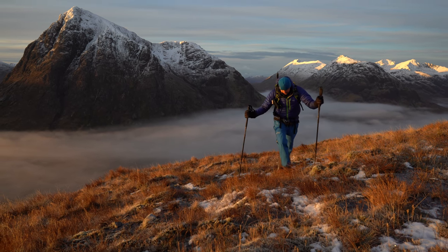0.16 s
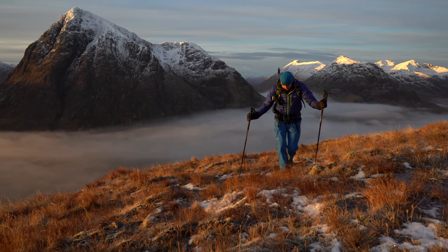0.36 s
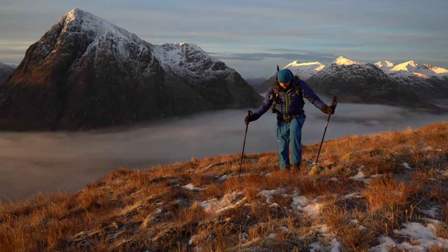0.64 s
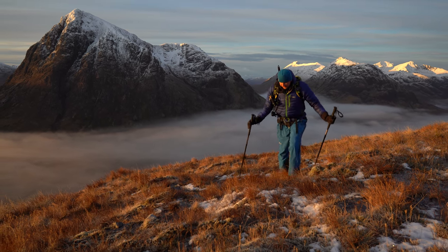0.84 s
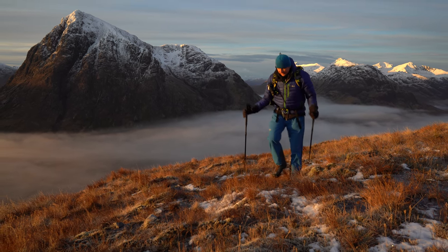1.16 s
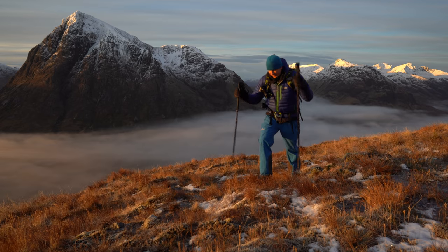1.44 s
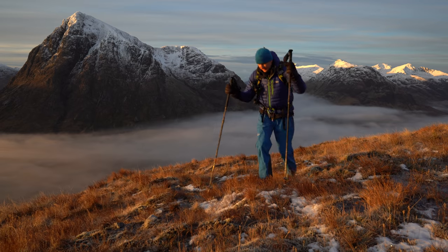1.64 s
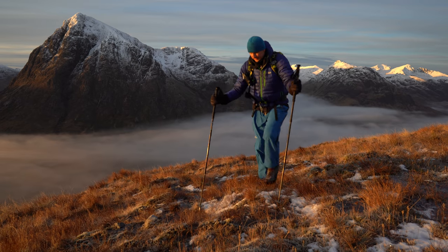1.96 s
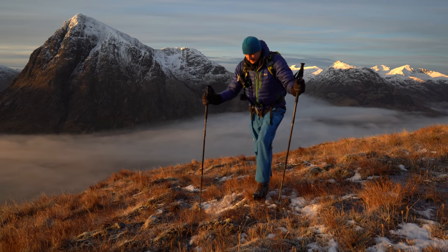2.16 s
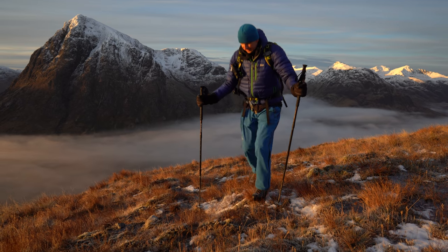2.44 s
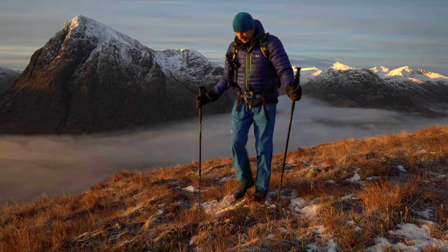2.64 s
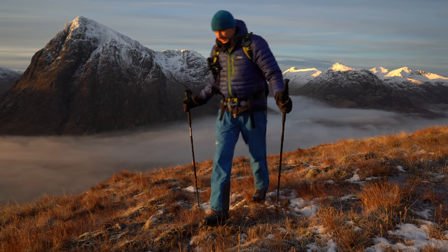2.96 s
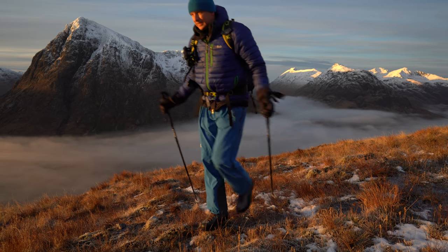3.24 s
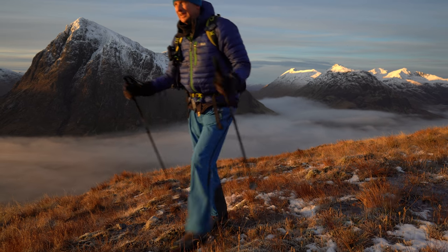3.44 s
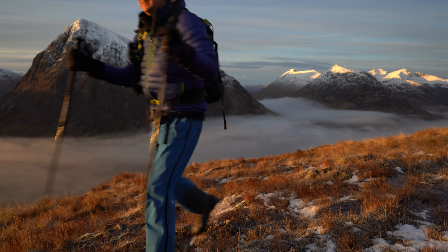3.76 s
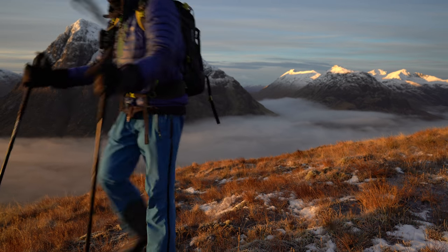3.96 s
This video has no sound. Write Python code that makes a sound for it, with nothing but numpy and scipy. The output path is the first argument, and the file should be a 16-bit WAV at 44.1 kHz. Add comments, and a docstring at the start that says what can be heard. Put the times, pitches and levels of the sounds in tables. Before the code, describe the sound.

Footsteps approach a stationary microphone outdoors, crushing frozen tufts over a faint hush of air. Walking poles tap and clothing rustles softly with each stride. From about halfway, the crunches get louder, with dull thuds and a low ground rumble. The hiker crosses from right to left, ending with a heavy, near step, a short buzzing shudder and a few bright metallic clicks.

```python
"""Hiker on frosty grass

A hiker with two poles comes up a slope and passes, right to left, close to a camera on a tripod.
Boots and pole tips crush frozen tufts, the shafts tap, and clothing swishes over faint open air.
Near steps thud through the turf, the last shakes the tripod, and metal fittings click."""
import sys
import numpy as np
from scipy.fft import rfft, irfft, next_fast_len
from scipy.io import wavfile
from scipy.ndimage import map_coordinates

SR = 44100
rng = np.random.default_rng(int(sys.argv[2]) if len(sys.argv) > 2 else 0)


def store_pcm(level_fs):
    """Save levels as 16-bit WAV."""
    pcm = np.round(np.clip(level_fs, -1, 1) * 32767).astype(np.int16)
    wavfile.write(sys.argv[1], SR, np.atleast_2d(pcm).T)


N = 180501


def amp(db):
    return 10 ** (np.asarray(db) / 20)


def unit_rms(x):
    return x / np.sqrt(np.mean(x ** 2) + 1e-20)


def unit_peak(x):
    return x / (np.abs(x).max() + 1e-20)


def log_interp(points, hz):
    """Interpolate (frequency [Hz], value) points on a log axis."""
    freqs, values = np.transpose(points)
    return np.interp(np.log(hz + 1), np.log(freqs + 1), values)


def wobble(rate_hz):
    """Smooth random curve, rate_hz knots a second."""
    knots = rng.standard_normal(int(N * rate_hz / SR) + 4)
    return map_coordinates(knots, [np.arange(N) * rate_hz / SR])


def attack(t, rise_s):
    return 1 - np.exp(-t / rise_s)


def swell(peak_s, rise_s):
    """Smooth rise to peak_s, quicker fall."""
    t = np.arange(N) / SR - peak_s
    return np.exp(-(t / np.where(t < 0, rise_s, 0.78 * rise_s)) ** 2)


def filtered(x, response):
    """Apply the gain response(hz)."""
    n = x.shape[-1]
    size = next_fast_len(n + 8192)
    return irfft(rfft(x, size) * response(np.fft.rfftfreq(size, 1 / SR)), size)[..., :n]


def treble_shelf(x, db, corner_hz=4500):
    return filtered(x, lambda hz: amp(db * hz ** 4 / (hz ** 4 + corner_hz ** 4)))


def pan(left_minus_right_db):
    return amp(np.array([left_minus_right_db / 2, -left_minus_right_db / 2]).reshape(2, -1))


def add(track, start_s, x):
    i = max(round(start_s * SR), 0)
    track[..., i:i + x.shape[-1]] += x[..., :max(N - i, 0)]


# Near sources: (frequency [Hz], L-R correlation [ratio])
NEAR_CORRELATION = [(150, 1), (500, 0.97), (1200, 1), (3000, 0.88), (10000, 0.36)]

def stereo(pair, spectrum, correlation=NEAR_CORRELATION):
    """Mix two independent signals to a given spectrum and L-R correlation."""
    def mid_side_gains(hz):
        angle = np.arccos(np.clip(log_interp(correlation, hz), -1, 1)) / 2
        return amp(log_interp(spectrum, hz)) * np.array([np.cos(angle), np.sin(angle)])
    mid, side = filtered(pair, mid_side_gains)
    return np.array([mid + side, mid - side])


def grains(n, rate_hz, scatter_db):
    """Two trains of random impulses; scatter_db makes a few much larger."""
    sizes = amp(scatter_db * np.minimum(rng.standard_exponential((2, n)), 4))
    signs = rng.choice([-1, 1], (2, n))
    return unit_rms(sizes * signs * (rng.random((2, n)) < rate_hz / SR))


def noise(spectrum, correlation=NEAR_CORRELATION, grain=0, rate_hz=500, scatter_db=4):
    """Stereo noise of rms 1, optionally grainy."""
    pair = rng.standard_normal((2, N)) + grain * grains(N, rate_hz, scatter_db)
    return unit_rms(stereo(pair, spectrum, correlation))


def burst(envelope, spectrum):
    """Stereo noise burst of peak 1."""
    return unit_peak(stereo(rng.standard_normal((2, len(envelope))) * envelope, spectrum))


# Hiker's route: (time [s], distance [m], bearing to the left [deg])
PATH = [(0, 7.5, -15), (1.9, 7.44, -11), (2.7, 4.03, -5), (3.3, 3.08, -1.5), (3.88, 2.32, 14),
        (4.09, 1.9, 24.5)]

def hiker_path():
    """Distance [m] and bearing [deg] per sample."""
    times_s, *columns = np.transpose(PATH)
    return [np.interp(np.arange(N) / SR, times_s, column) for column in columns]


def arrival_delay(x, bearing_deg, mic_spacing_m=0.094, sound_m_per_s=343):
    """Sound from one side reaches the nearer microphone first."""
    n = np.arange(N)
    shift = mic_spacing_m * np.sin(np.radians(bearing_deg)) / sound_m_per_s * SR / 2
    left = map_coordinates(x[0], [n + shift], order=5)
    right = map_coordinates(x[1], [n - shift], order=5)
    return np.array([left, right])


# Open air: (frequency [Hz], gain [dB])
AIR_SPECTRUM = [(25, -27), (55, -12), (100, -3.5), (170, -8), (350, 0), (700, 2.5), (1150, 8), (1600, 1),
                (3000, -2.5), (5500, -7), (9500, -11), (11500, -14), (15500, -25)]
# Diffuse field: (frequency [Hz], L-R correlation [ratio])
DIFFUSE_CORRELATION = [(150, 0.83), (350, 0.78), (700, 0), (1400, 0), (6000, 0.32)]

def open_air():
    """Faint, steady hush from all around."""
    return amp(-61) * noise(AIR_SPECTRUM, DIFFUSE_CORRELATION)


# Deep ground rumble: (frequency [Hz], gain [dB])
RUMBLE_SPECTRUM = [(8, 3.5), (16, 6), (28, -10.5), (55, -7.5), (105, -14.5), (200, -15), (600, -75)]
# Turf underfoot: (frequency [Hz], gain [dB])
TREAD_SPECTRUM = [(50, -52), (130, -2.5), (330, 4), (500, -3.5), (900, -9), (2500, -48)]

def ground(loss_db_per_m=4, springy_from_s=1.926, crossover_s=0.38):
    """Shifting weight rumbles, more once the hiker is on the springy turf that carries the tripod."""
    distance_m, _ = hiker_path()
    loss_db = loss_db_per_m * distance_m
    firmness = np.clip(1 - (np.arange(N) / SR - springy_from_s) / crossover_s, 0, 1)
    rumble_db = -35.5 - loss_db - 30.5 * firmness + 5.6 * wobble(12)
    rumble = amp(rumble_db) * noise(RUMBLE_SPECTRUM, correlation=[(100, 1)])
    tread_db = -42.5 - loss_db - firmness + 2.5 * wobble(24.905)
    tread = amp(tread_db) * noise(TREAD_SPECTRUM, grain=0.23, rate_hz=190, scatter_db=6.5)
    return rumble + tread


# Leg swings: (time [s], fabric level [dB], sheen re fabric [dB], grass level [dB], sleeve lag [s])
STRIDES = [(.13, -63, 1.5, -61.5, 0.3), (0.772, -65.5, 4.5, -82, 0.37), (1.522, -57.5, -1, -61.5, 0.36),
           (2.27, -63.5, -8.5, -60.5, 0.4), (2.97, -63, -2, -61.5, .22), (3.635, -55.5, -4, -52, 0.18)]
# Rubbing weave: (frequency [Hz], gain [dB])
RASP_SPECTRUM = [(1200, -37), (2500, -8.5), (4300, -1), (5200, -4.5), (5900, 2), (6800, -5), (8500, -15),
                 (12000, -17)]
# Smooth nylon: (frequency [Hz], gain [dB])
SHEEN_SPECTRUM = [(5000, -18), (8000, -1), (9600, 1.5), (11300, -9.5), (13000, 2), (15500, -11)]
# Wide patches of rustle: (frequency [Hz], L-R correlation [ratio])
RUSTLE_CORRELATION = [(300, 1), (1200, 0.99), (4000, 0.65), (10000, 0.23)]

def clothing(sleeve_db=-67.5, sleeve_sheen_db=-3.5):
    """Trouser legs slide past each other once a stride; a sleeve follows more softly."""
    rasp_gain, sheen_gain = np.zeros(N), np.zeros(N)
    for time_s, fabric_db, sheen_db, _, lag_s in STRIDES:
        leg = amp(fabric_db) * swell(time_s, rise_s=0.14)
        sleeve = amp(sleeve_db) * swell(time_s + lag_s, rise_s=0.12)
        rasp_gain += leg + sleeve
        sheen_gain += amp(sheen_db) * leg + amp(sleeve_sheen_db) * sleeve
    rasp = rasp_gain * noise(RASP_SPECTRUM, RUSTLE_CORRELATION, grain=1, rate_hz=2300, scatter_db=17)
    sheen = sheen_gain * noise(SHEEN_SPECTRUM, RUSTLE_CORRELATION)
    return (rasp + sheen) * amp(3 * wobble(53))


# Boot or pole settling in grass: (time [s], level [dB])
STIRS = [(.86, -63), (1.66, -58.5), (3.07, -57.5)]
# Brushed stems: (frequency [Hz], gain [dB])
GRASS_SPECTRUM = [(150, -37), (500, -5.5), (1150, -3), (2200, -4), (3500, -12.5), (6000, -13.5),
                  (15000, -16)]

def grass(idle_db=-65.5, settle_s=0.43):
    """Stems rustle and tick, more as a boot sweeps through and after weight settles."""
    t = np.arange(N) / SR
    sweeps = sum(amp(db) * swell(time_s, rise_s=0.17) for time_s, _, _, db, _ in STRIDES)
    stirs = sum(amp(db) * (t > time_s) * np.exp(-np.abs(t - time_s) / settle_s) for time_s, db in STIRS)
    stems = noise(GRASS_SPECTRUM, RUSTLE_CORRELATION, grain=0.45, rate_hz=200, scatter_db=3)
    envelope = np.sqrt(amp(idle_db) ** 2 + sweeps ** 2 + stirs ** 2)
    return envelope * amp(0.93 * wobble(36)) * stems


# Weight landing on turf: (time [s], relative level [dB], pitch [Hz])
THUDS = [(.842, -49, 330), (1.406, -42.5, 425), (1.922, -41, 450), (2.185, -32, 437), (2.503, -37, 344),
         (2.565, -41.5, 159), (2.801, -35, 228), (3.358, -26, 197), (3.897, -17, 248)]

def thuds(peat_hz=59, heave_db=10.5, heave_loss_db_per_m=6):
    """Each landing is a heavily damped push, a slower heave of the peat and a soft puff."""
    out, t = np.zeros((2, N)), np.arange(SR // 6) / SR
    distance_m, _ = hiker_path()
    for time_s, db, hz in THUDS:
        dent = np.sin(np.pi * hz * t) ** 2 * np.exp(-t * hz)
        push = unit_peak(np.gradient(dent))  # turf is heard by how fast it gives way
        heave = unit_peak(np.cos(2 * np.pi * peat_hz * t) * attack(t, 0.0016) * np.exp(-t / 0.0045))
        heave_gain = amp(heave_db - heave_loss_db_per_m * distance_m[round(time_s * SR)])
        puff = burst(np.exp(-t / 0.0076), TREAD_SPECTRUM)
        add(out, time_s, amp(db) * (0.073 * puff - 0.62 * push - heave_gain * heave))
    return out


def ringing(modes, t):
    """Damped modes with new phases and slightly varied strengths per blow."""
    return sum(amp(db + rng.normal(0, 0.18) - 60 * t / t60_s) * np.sin(2 * np.pi * (hz * t + rng.random()))
               for hz, db, t60_s in modes)


# Tripod resonances: (frequency [Hz], gain [dB], t60 [s])
TRIPOD_MODES = [(140.7, -0.5, 1.24), (226, 1.5, 1.2), (261, 1, 1.2), (317, 5, 1.3), (329, 5, 0.32),
                (402, -7, 0.64), (436, -8, 0.63), (590, -12, 1), (730, -1, 0.43), (773, -7, 0.72),
                (1260, -3, 0.31)]
# Loose joints: (frequency [Hz], gain [dB])
BUZZ_SPECTRUM = [(120, -28), (300, -9), (520, -8), (820, 7), (1080, -7.5), (1350, -6.5), (2400, -9),
                 (3300, -19.5), (5000, -26), (12000, -34)]

def tripod(buzz_t60_s=0.86):
    """The last, nearest step leaves the stand shuddering and its loose joints buzzing."""
    out, t = np.zeros((2, N)), np.arange(SR // 2) / SR
    shudder = amp(-44.5) * ringing(TRIPOD_MODES, t) * amp(3.5 * wobble(63)[:len(t)])
    joints = noise(BUZZ_SPECTRUM, grain=0.41, rate_hz=2100, scatter_db=0)[:, :len(t)]
    buzz = amp(-38.5 - 60 * t / buzz_t60_s) * joints
    add(out, THUDS[-1][0], (shudder + buzz) * attack(t, 0.00046))
    return out


# Fittings colliding: (time [s], relative level [dB])
CLICKS = [(4.0362, -34), (4.0445, -23.5), (4.0547, -34), (4.0598, -25), (4.0834, -20)]
# Fitting resonances: (frequency [Hz], gain [dB], t60 [s])
METAL_MODES = [(5707, -25, 0.036), (5930, 7, 0.015), (6630, -1, 0.028), (8860, 1, 0.014),
               (11100, 2, 0.0084)]
# Bright, hard contact: (frequency [Hz], gain [dB])
CONTACT_SPECTRUM = [(1000, -6.5), (3000, -1), (5800, -3.5), (7500, -9.5), (9500, -10.5), (11500, -8),
                    (15500, -15)]

def fittings():
    """Small metal parts chatter together with a short, high ring."""
    out, t = np.zeros((2, N)), np.arange(SR // 20) / SR
    for time_s, db in CLICKS:
        chatter = burst(t * np.exp(-t / 0.0015), CONTACT_SPECTRUM)
        modes = np.array([ringing(METAL_MODES, t), ringing(METAL_MODES, t)])
        ring = unit_peak(modes * attack(t, 0.00037))
        add(out, time_s, amp(db + 3.5) * (chatter + 0.59 * ring))
    return out


# Boots and tips crushing tufts: (time [s], length [s], level [dB], treble [dB])
CRUNCHES = [(.001, 0.021, -51, 8.5), (0.727, 0.016, -48, -3), (0.759, 0.017, -46.5, 3.5),
            (.791, 0.035, -53, -12), (1.395, .02, -42.5, 4.5), (1.476, 0.049, -51.5, 8.5),
            (1.627, 0.0041, -47, 14.5), (1.93, 0.0064, -41.5, 7), (2.161, 0.016, -35, 3),
            (2.261, 0.0068, -47, 2), (2.545, 0.019, -57, -15), (2.934, .032, -49, 7),
            (2.974, 0.0023, -39, 5), (3.439, 0.043, -58.5, 2), (3.515, 0.019, -53, -30),
            (3.62, 0.036, -47.5, -2), (3.998, 0.014, -38.5, 3), (4.021, 0.07, -43, 4)]
# Fracturing frost: (frequency [Hz], gain [dB])
FROST_SPECTRUM = [(100, -28), (380, -5.5), (800, -4.5), (1400, -1.5), (2300, -4), (3500, -8), (5500, -11.5),
                  (9000, -18), (15500, -22.5)]

def crunches():
    """A frozen tuft gives way in a dense run of fractures; longer crushes rise and fall more slowly."""
    out, t = np.zeros((2, N)), np.arange(SR // 5) / SR
    for time_s, length_s, db, treble_db in CRUNCHES:
        rise_s, fall_s = 0.0008 + 0.23 * length_s, 0.004 + 0.46 * length_s
        press = np.minimum(t / rise_s, 1) * np.exp(-np.maximum(t - length_s, 0) / fall_s)
        fractures = stereo(grains(len(t), rate_hz=9000, scatter_db=4), FROST_SPECTRUM)
        add(out, time_s, amp(db) * press * unit_rms(treble_shelf(fractures, treble_db)))
    return out


def twigs(rate_hz=9, centre_hz=1440):
    """Small stems break at random, louder as the hiker nears; rows as in SNAPS."""
    distance_m, _ = hiker_path()
    rows = []
    for when, size, pitch in rng.random((round(rate_hz * N / SR), 3)):
        db = -29.5 - 20 * np.log10(distance_m[int(when * N)]) - 1.5 * np.log(size + 0.033)
        rows.append((when * N / SR, db, centre_hz * 2 ** (2 * pitch - 1)))
    return rows


# Ice crust and stiff stems breaking: (time [s], relative level [dB], pitch [Hz])
SNAPS = [(0.525, -39, 1550), (1.502, -28.5, 930), (1.957, -35, 2500), (2.001, -39.5, 910),
         (2.185, -17.5, 1407), (2.344, -32, 1460), (2.594, -39, 720), (2.678, -41, 2240),
         (3.624, -31.5, 1310), (3.681, -27, 1080), (3.896, -30, 1180)]

def snaps(low_cut_hz=510, crack_db=-13):
    """Crust or a stem breaks: a few uneven cycles at its own pitch, a bright crack, falling crumbs."""
    out, t = np.zeros((2, N)), np.arange(SR // 20) / SR
    for time_s, db, hz in SNAPS + twigs():
        modes = [(hz, 0, 0.008), (1.58 * hz, -5, 0.006), (0.726 * hz, -8, 0.007)]
        plate = ringing(modes, t) * attack(t, 0.00051)
        # a small piece radiates no bass
        body = unit_peak(filtered(plate, lambda f: (1j * f / (low_cut_hz + 1j * f)) ** 2))
        crack = burst(np.exp(-t / 0.0032), CONTACT_SPECTRUM)
        crumbs = burst(np.exp(-t / 0.0048), FROST_SPECTRUM)
        add(out, time_s, amp(db - 4.5) * (1.05 * body + 0.3 * crumbs + amp(crack_db) * crack))
    return out


# Pole strikes: (time [s], relative level [dB], grind time [s], treble [dB], L-R [dB])
POLE_STRIKES = [(1.9189, -14.5, 0.0041, 7.5, -5), (2.894, -30.5, 0.00027, 6.5, -5.5),
                (2.899, -33, 0.00064, -12, -1), (3.062, -27.5, 0.0003, -19, -6.5)]
# Shaft resonances: (frequency [Hz], gain [dB], t60 before strike damping [s])
SHAFT_MODES = [(1096, -3, 0.071), (1567, 1, 0.052), (1770, 1.5, 0.031), (2314, 13, 0.012),
               (3150, 10, 0.0089), (3500, 10.5, 0.016), (4130, -0.5, 0.013), (7980, 0, 0.015),
               (7920, -11, 0.071)]
# Tip in the crust: (frequency [Hz], gain [dB])
TIP_SPECTRUM = [(120, -33), (400, -4), (850, -6.5), (1300, 3), (2800, -1.5), (4200, -7.5), (6500, -15.5),
                (8600, -10.5), (11000, -20), (15000, -25)]

def poles():
    """The tip grinds through the crust for a few milliseconds and rings the damped shaft."""
    out, t = np.zeros((2, N)), np.arange(SR // 12) / SR
    for time_s, db, grind_s, treble_db, side_db in POLE_STRIKES:
        bite = attack(t, 0.00041) * np.exp(-np.maximum(t - grind_s, 0) / 0.0032)
        grit = unit_peak(treble_shelf(burst(bite, TIP_SPECTRUM), treble_db))
        damping = np.exp(-t / (8 * grind_s))  # a barely planted tip gives only a brief ring
        ring = ringing(SHAFT_MODES, t) * attack(t, 0.0011) * damping
        shaft = unit_peak(treble_shelf(ring, min(treble_db, 0)))
        add(out, time_s, amp(db) * pan(side_db) * (0.8 * shaft + 0.55 * grit))
    return out


def scene(pan_db_per_deg=0.3281):
    """The hiker crosses from right to left over ground rumble and open air."""
    _, bearing_deg = hiker_path()
    hiker = crunches() + snaps() + fittings() + grass() + clothing()
    airborne = pan(pan_db_per_deg * bearing_deg) * hiker + poles()
    return arrival_delay(airborne, bearing_deg) + thuds() + tripod() + ground() + open_air()


def record(dry, band_limit_hz=16000):
    """Brick-wall low-pass."""
    return filtered(dry, lambda hz: hz < band_limit_hz)


dry = scene()
out = record(dry)
store_pcm(out)
```